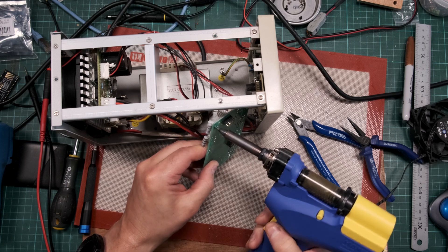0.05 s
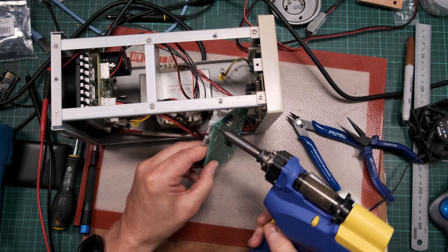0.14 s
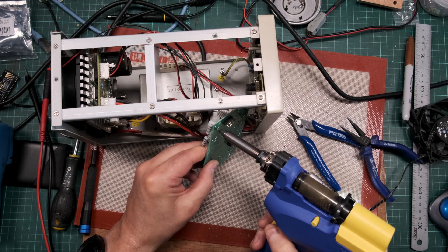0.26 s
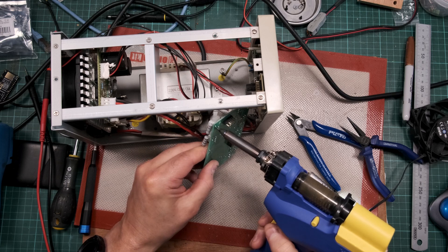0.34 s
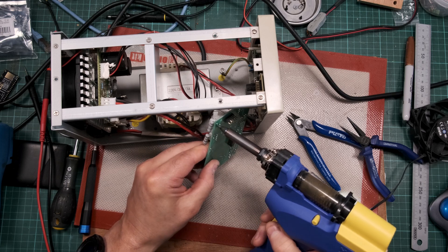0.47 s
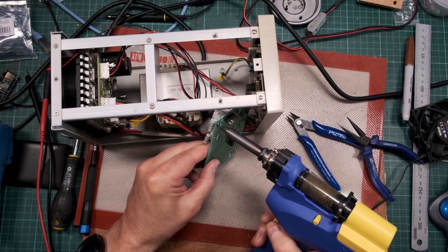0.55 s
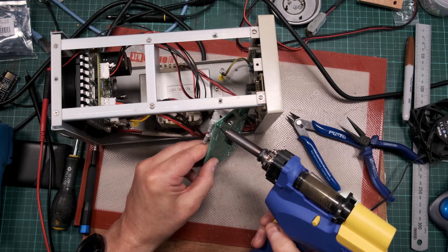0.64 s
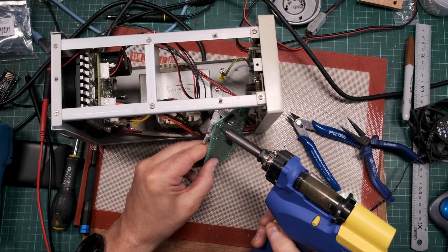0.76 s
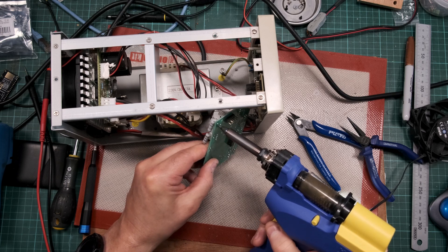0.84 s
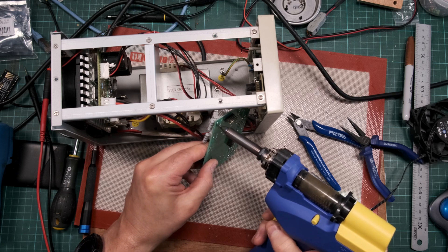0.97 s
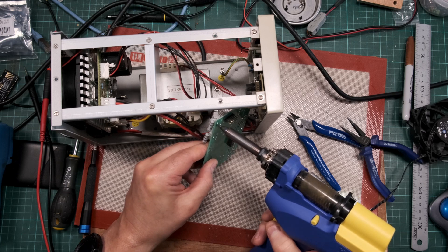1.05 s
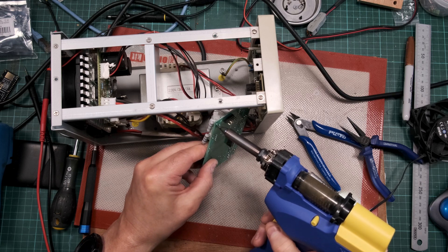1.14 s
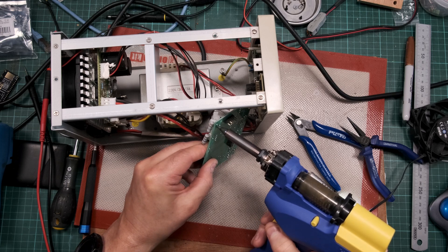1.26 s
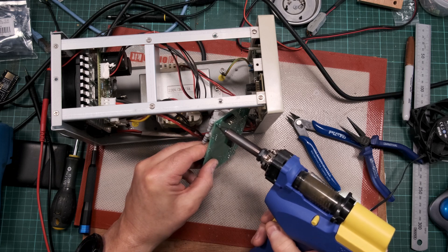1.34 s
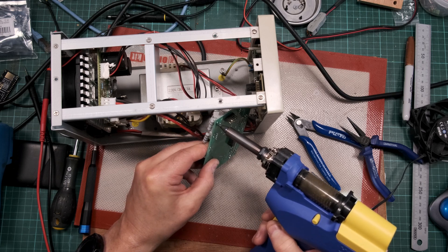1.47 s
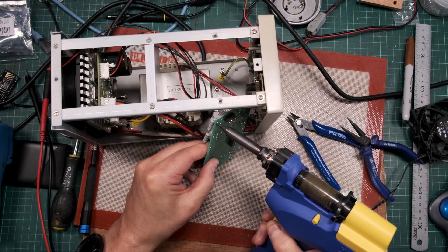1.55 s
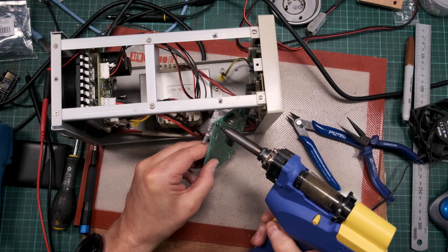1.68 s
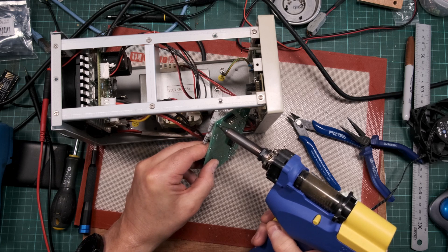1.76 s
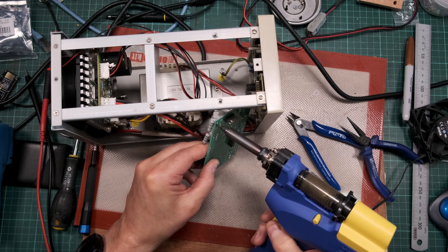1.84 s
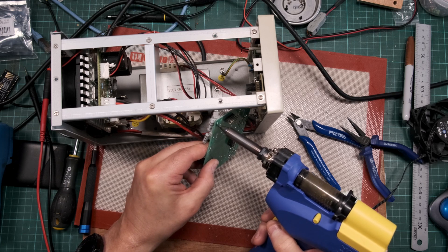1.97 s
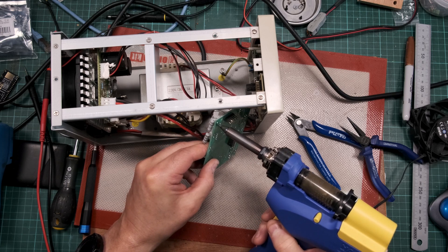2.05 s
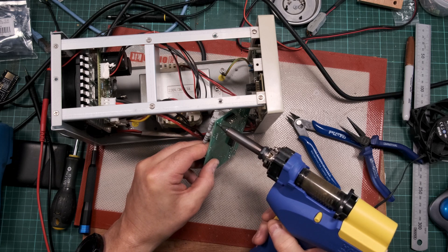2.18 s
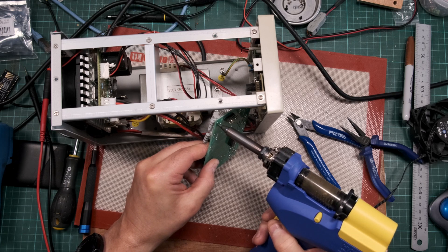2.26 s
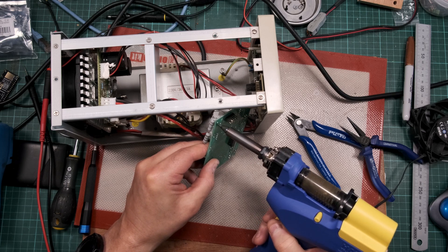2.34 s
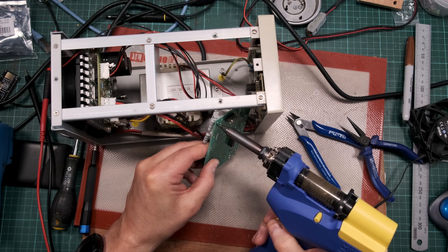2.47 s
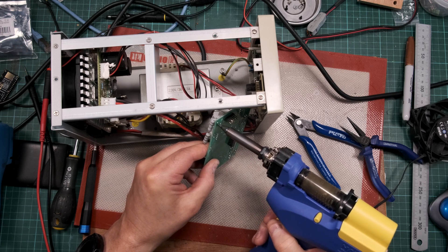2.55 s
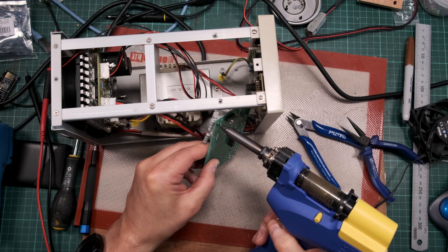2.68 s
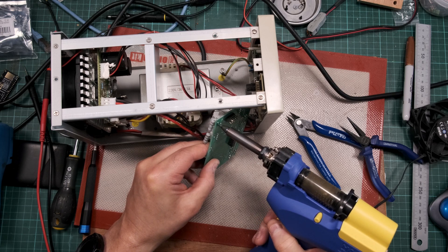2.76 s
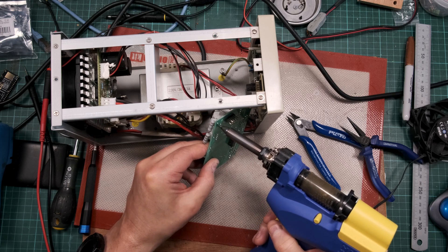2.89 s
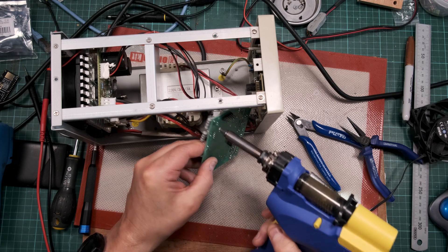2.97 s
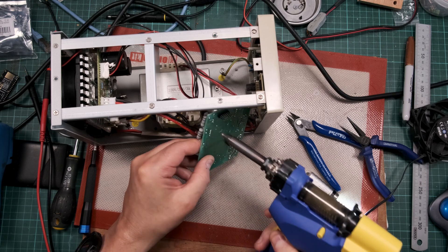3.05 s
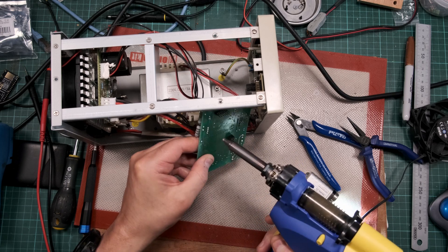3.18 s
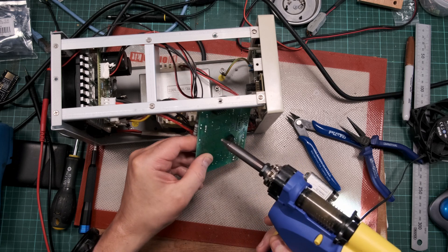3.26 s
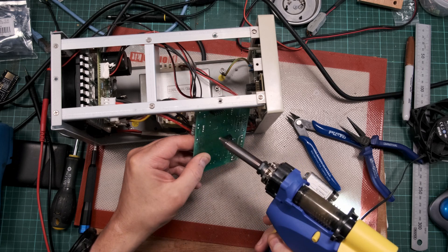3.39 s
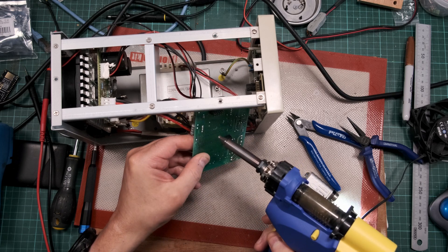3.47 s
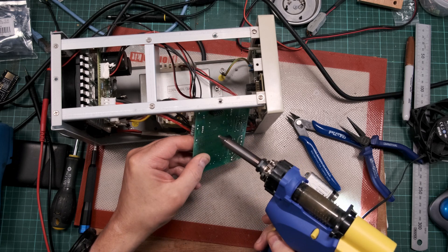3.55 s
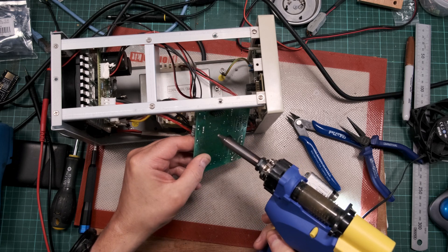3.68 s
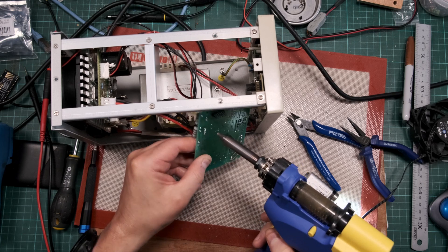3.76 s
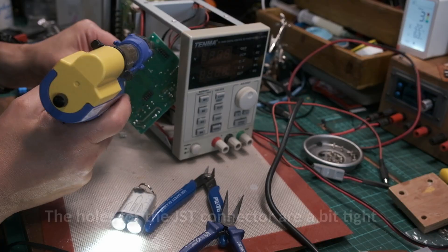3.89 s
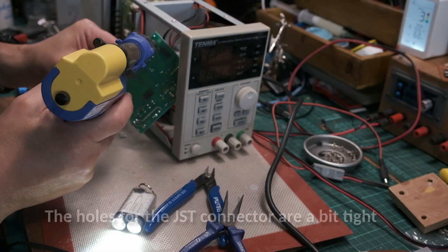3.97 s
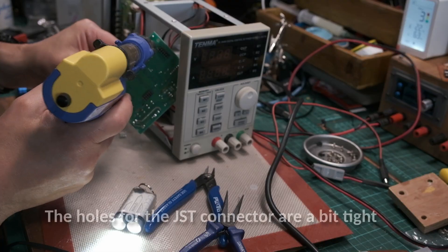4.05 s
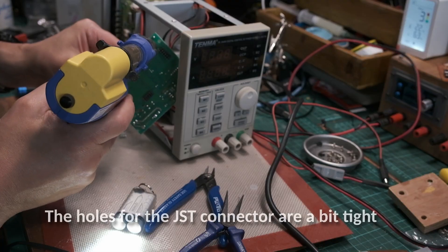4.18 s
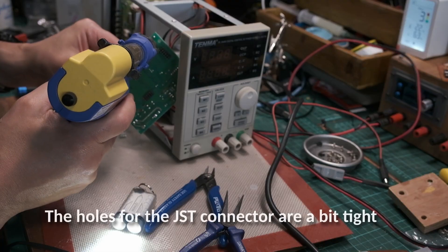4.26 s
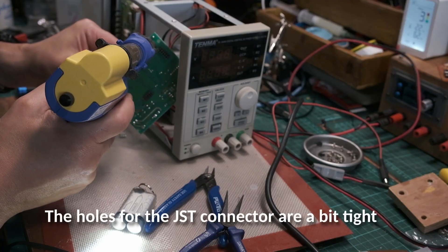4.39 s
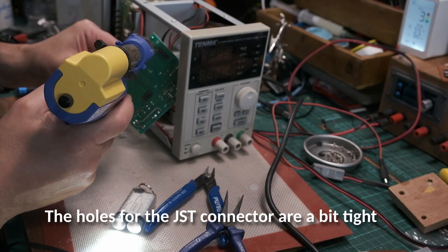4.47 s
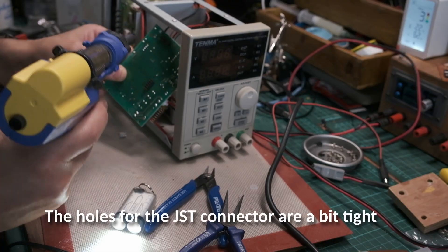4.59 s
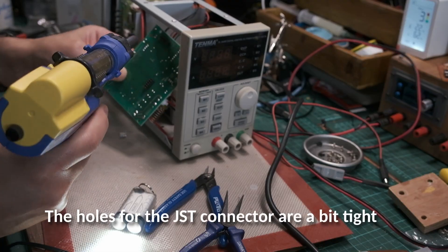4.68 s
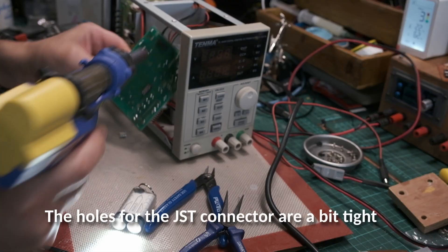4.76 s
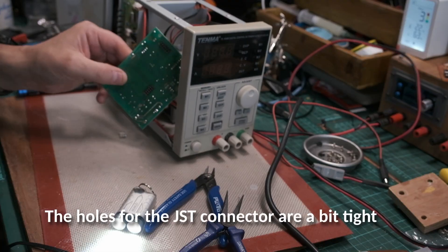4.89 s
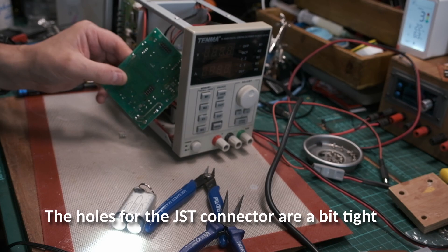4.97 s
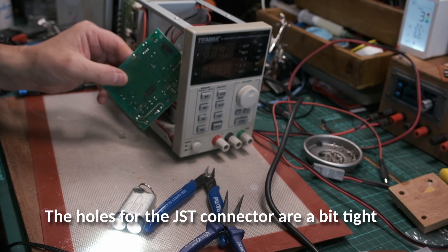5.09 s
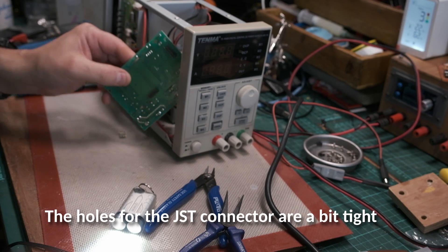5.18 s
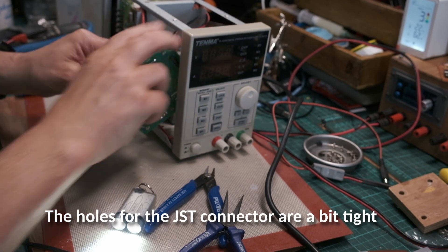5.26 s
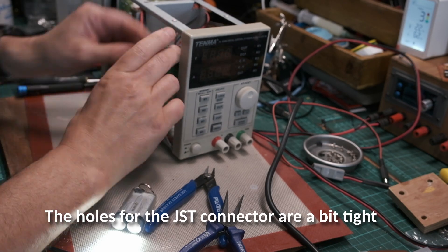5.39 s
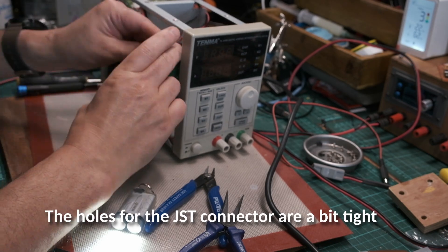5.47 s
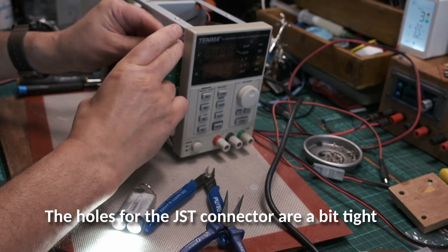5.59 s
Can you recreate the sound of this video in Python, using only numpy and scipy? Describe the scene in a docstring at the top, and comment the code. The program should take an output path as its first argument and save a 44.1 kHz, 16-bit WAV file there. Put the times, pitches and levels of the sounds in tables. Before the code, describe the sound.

In a quiet room with faint fan noise, a desoldering gun's pump buzzes in two short bursts between trigger clicks, then is set down with a clack.

```python
"""Desoldering gun on a workbench

A diaphragm pump runs in two short bursts between trigger clicks: pulse trains of its strokes excite the
housing, the pumped air and the valve. The tip ticks on a circuit board as struck modes, and at the end
the gun is laid down and hands rub over the board in swells of grainy noise. A fan, made of filtered noise
and wavering tones, and a low hum fill the quiet room; the level dips once for a moment."""
import sys
import numpy as np
from scipy import signal
from scipy.fft import rfft, irfft
from scipy.io import wavfile
from scipy.ndimage import uniform_filter1d

SR = 44100
rng = np.random.default_rng(int(sys.argv[2]) if len(sys.argv) > 2 else 0)


def to_linear_factor(level_db):
    """Convert decibel levels (scalar or array-like) to linear amplitude factors."""
    exponent = np.asarray(level_db, float) / 20
    return 10 ** exponent


def inscribe(sig):
    """Save sig as 16-bit PCM at rate SR to the path in sys.argv[1].

    A 1-D sig is mono; a 2-D sig holds one channel per row.
    Samples are clipped to [-1, 1] before scaling.
    """
    pcm = np.round(np.clip(np.atleast_2d(sig).T, -1, 1) * 32767)
    wavfile.write(sys.argv[1], SR, pcm.astype(np.int16))


N = 248265  # length in samples

# Modes of the gun's stand, struck or scraped. Each row: frequency in Hz, level in dB, T60 in seconds.
STAND_MODES = [ (790, -8, .1), (2060, -8, .08), (2500, -2, .05), (2890, -1, .075), (3290, -5, .07),
               (4120, -3, .065), (4720, -3, .05), (5400, -3, .03), (6300, 2, .025), (8120, -10, .05),
               (9400, -20, .08)]


def evened(x):
    """Power normalisation: scales to an rms of 1."""
    return x / np.sqrt(np.mean(x ** 2) + 1e-20)


def read(points, hz):
    """Spectral envelope: gain interpolated in dB over log frequency."""
    f, db = np.transpose(points)
    return to_linear_factor(np.interp(np.log(hz + 1), np.log(f + 1), db))


def peaks(modes, hz):
    """Resonance: steep-sided peaks added in power."""
    power = sum(to_linear_factor(db) ** 2 / (1 + (2 * (hz - f) / width) ** 2) ** 1.86 for f, width, db in modes)
    return np.sqrt(power)


def colour(x, gain):
    """Minimum phase: a causal filter of unit energy built from the gain curve by the Hilbert transform."""
    log_gain = np.log(gain(np.fft.rfftfreq(8192, 1 / SR)) + 1e-5)
    log_gain = np.r_[log_gain, log_gain[-2:0:-1]]
    response = np.exp(log_gain - 1j * signal.hilbert(log_gain).imag)
    impulse = np.fft.ifft(response).real[:4096]
    return signal.oaconvolve(x, impulse / np.linalg.norm(impulse))[:len(x)]


def band(x, tone, lo_hz, hi_hz):
    """Band-pass filtering: one band of a coloured noise, at an rms of 1."""
    return evened(colour(x, lambda f: read(tone, f) / (1 + (lo_hz / (f + 1)) ** 6) / (1 + (f / hi_hz) ** 6)))


def add(mix, s, sound):
    """Superposition: adds a sound to the mix from a time in seconds."""
    part = mix[round(s * SR):][:len(sound)]
    part += sound[:len(part)]


def wander(size, count):
    """Slow random fluctuation: white noise averaged twice over `size` points, at an rms of 1."""
    once = uniform_filter1d(rng.standard_normal(count), size)
    return evened(uniform_filter1d(once, size))


def train(turns):
    """Pulse train: one pulse per completed stroke, shared between the two nearest samples."""
    at = np.interp(np.arange(np.ceil(turns[0]), turns[-1]), turns, np.arange(len(turns)))
    out = np.zeros(len(turns) + 1)
    np.add.at(out, at.astype(int), 1 - at % 1)
    np.add.at(out, at.astype(int) + 1, at % 1)
    return out[:-1]


def blur(x, spread):
    """Dispersion: each band has its own group delay, so strokes lose their edge but keep their pitch."""
    z = rfft(x)
    bass = np.exp(-np.fft.rfftfreq(len(x), 1 / SR) / 700)
    varied = .5 + np.sin(3.16 * wander(size=len(z) // 60, count=len(z))) / 2
    delay = spread * (1.3 * bass + (1 - bass) * varied)  # the deepest bass lags 1.3 spreads
    phase = -2 * np.pi * np.cumsum(delay) * SR / len(x)
    return irfft(z * np.exp(1j * phase), len(x))[:-SR // 50]


def padded(x):
    """Free decay: a tenth of a second of silence in which filters ring out."""
    return np.r_[x, np.zeros(SR // 10)]


def pump(speed, release_s, level_db, fade_db, clack_db, spread):
    """Periodic excitation: strokes push air, the valve opens and shuts and knocks the housing, air puffs."""
    # Housing resonances. Each row: frequency in Hz, width in Hz, level in dB.
    housing = [(539, 140, 5), (760, 110, -2), (901, 83, 1), (1036.7, 107, -1.5), (1310, 110, -3.5),
               (1480, 80, -3), (1825, 71, -4), (1902, 490, -8), (2340, 130, -4.5), (2595, 500, -13),
               (3570, 206, -10), (4080, 58, -20)]
    # Spectrum of the pumped air. Each row: frequency in Hz, level in dB.
    push_tone = [(40, -36.5), (70, -17.5), (95, -5.5), (140, -4.5), (190, -2.5), (285, 3), (380, -4),
                 (480, -10), (700, -41), (2500, -82)]
    # Valve and nozzle resonances. Each row: frequency in Hz, width in Hz, level in dB.
    valve_modes = [(3280, 1660, 0), (4880, 1250, -3.5), (5930, 410, 1), (6640, 530, 3.5), (7440, 260, 1),
                   (8280, 640, 2.5), (8920, 1250, -3.5), (9850, 67, -3.5), (10900, 470, -7),
                   (11800, 1200, -9.5), (14300, 1100, -15.5)]
    # The diaphragm lands in several blows. Each row: delay in seconds, level in dB.
    bounces = [(0, -1.5), (.001, -4), (.0019, -6.5), (.0029, -14.5)]
    # Every start is weak and builds up. Each row: strokes done, level in dB.
    start_rise = [(0, -5), (1, 0), (3.5, 1.5), (11, 2.5)]
    s, hz = np.transpose(speed)
    t = np.arange(s[0], s[-1], 1 / SR)
    rate = np.interp(t, s, hz)
    turns = np.cumsum(rate) / SR - rate[0] / SR
    slack = 1 - rate / 95  # 0 at the full speed of 95 strokes per s, 1 at standstill
    fresh = np.exp(-turns / 14.9)  # the start settles over 14.9 strokes
    coast = slack * (t > t.mean())  # slowing in the later half

    knock_db = level_db + np.interp(turns, *np.transpose(start_rise)) - fade_db * np.maximum(t - release_s, 0)
    push_db = -6.5 - 6 * slack  # over the knock
    clack_db = clack_db + 5 * fresh + 7.5 * coast
    open_db = -5 + 12 * coast  # opening clack over the shutting
    lag = .235 + .14 * fresh + .26 * coast ** 2  # share of a stroke until the valve shuts
    force = to_linear_factor(knock_db) * np.sqrt(SR / rate)  # fewer strokes carry the same power in larger blows
    opens, shuts = force * train(turns), force * train(turns - lag)

    lands = sum(to_linear_factor(db) * np.r_[np.zeros(round(s * SR)), opens][:len(t)] for s, db in bounces)
    loose = to_linear_factor(3) * np.clip(98 / rate - 1, 0, .45)  # at low speed the rod judders through the stroke
    judder = signal.oaconvolve(opens * loose, np.hanning(260))[:len(t)] * rng.standard_normal(len(t)) / 10
    # rushing air shakes the housing all along, more at low speed until the trigger is let go
    flow_db = knock_db - 18 + 22 * loose * (t < release_s)
    flow = to_linear_factor(flow_db) * rng.standard_normal(len(t))
    blows_on_housing = lands + judder + to_linear_factor(-13) * shuts + flow  # shutting knocks more softly
    knock = colour(padded(blows_on_housing),
                   lambda f: peaks(housing, f) * f ** 2 / (f ** 2 + 450 ** 2) / (1 + (f / 4500) ** 4))

    push = colour(padded(opens * to_linear_factor(push_db)), lambda f: read(push_tone, f))

    hits = (to_linear_factor(open_db) * opens + shuts) * to_linear_factor(clack_db + 0.69 * wander(size=200, count=len(t)))
    rattle_decay = np.exp(-np.arange(400) / 26.0)
    rattle = signal.oaconvolve(hits, rattle_decay)[:len(t)] * rng.standard_normal(len(t)) * .05
    # rubber flaps are duller than the jet
    clack = signal.lfilter(*signal.butter(2, 10500, fs=SR), 0.42 * hits + rattle)
    puff_shape = 0.4 + np.exp(-(turns % 1) / 0.27)  # fades through each stroke
    puffs = puff_shape * to_linear_factor(knock_db + clack_db - 7) * rng.standard_normal(len(t))
    valve = colour(padded(clack + puffs), lambda f: peaks(valve_modes, f) * f ** 2 / (f ** 2 + 2500 ** 2))
    return t[0], blur(valve - knock - push, spread)


def pump_bursts():
    """Speed-controlled pulse rate: each burst follows its own curve of stroke rate."""
    # One curve a burst, a stroke at its start. Each row: time in seconds, pump strokes per second.
    speeds = [
        [(2.3404, 45.16), (2.3704, 72.76), (2.4004, 79.13), (2.4404, 86.73), (2.5004, 90.3), (2.6004, 93.92),
         (2.6704, 93.39), (2.7404, 95.53), (2.8104, 95.18), (2.8354, 78.01), (2.8624, 55.43), (2.8854, 32.18),
         (2.9374, 28.93)],
        [(4.2948, 67.76), (4.315, 69.92), (4.335, 92.12), (4.36, 90.83), (4.43, 94.73), (4.535, 92.79)],
    ]
    # One row a burst. Each row: trigger let go in seconds, knock level in dB, fade after that in dB per
    # second, valve clack in dB over the knock, spread of the strokes in seconds.
    bursts = [(2.83, -31.5, 225, -8, 0.00033), (4.519, -31.5, 640, -9.5, 0.0065)]
    out = np.zeros(N)
    for speed, burst in zip(speeds, bursts):
        add(out, *pump(speed, *burst))
    return out


def leak():
    """Turbulent jet noise: air leaks on after each burst as a thin steady hiss with soft ends."""
    # Each row: start in seconds, end in seconds, level in dB.
    leaks = [(2.913, 3.09, -62), (4.536, 4.595, -63)]
    # Spectrum of the hiss. Each row: frequency in Hz, level in dB.
    leak_tone = [(1500, 11), (3000, 2), (7000, 2), (10500, -6), (12500, -1), (13500, -4), (14800, 1),
                 (15800, 13)]
    hiss, out = band(rng.standard_normal(N), leak_tone, 2000, 17000), np.zeros(N)
    for start, end, db in leaks:
        part = hiss[round(start * SR):round(end * SR)]
        add(out, start, to_linear_factor(db) * part * signal.windows.tukey(len(part), .4))
    return out


def blows(events, modes, crack_db, vary_db, rise_s):
    """Modal impact: a crack of noise and decaying modes; dull blows favour the low ones."""
    out, t = np.zeros(N), np.arange(6000) / SR
    hz, db, t60 = np.transpose(modes)[:, :, None]
    draws = rng.standard_normal((len(events), 3, len(modes), 1))
    for (s, peak_db, dull), (vary, detune, phase) in zip(events, draws):
        tilt_db = db + vary_db * vary - 20 * (dull - .5) * np.log2(hz / 4500)
        ring = to_linear_factor(tilt_db - 60 * t / t60) * np.sin(2 * np.pi * hz * (1 + .01 * detune) * t + phase)
        ring = ring.sum(0)
        centre_hz = 12000 * 0.092 ** dull
        crack = colour(rng.standard_normal(len(t)) * to_linear_factor(-60 * t / .018),
                       lambda f: peaks([(centre_hz, centre_hz, 0)], f) * f / (f + 2000))
        blow = (ring / abs(ring).max() + to_linear_factor(crack_db) * crack / 3) * (1 - np.exp(-t / rise_s))
        add(out, s, to_linear_factor(peak_db) * blow / abs(blow).max())
    return out


def trigger():
    """Modal impact: the trigger switch clicks."""
    # Each row: time in seconds, peak level in dB, dullness (0 bright, 1 dull).
    clicks = [(2.3181, -25.5, 0.23), (2.3265, -34.5, 1.2), (2.3435, -15, 0.14), (2.8165, -24, 0.04),
              (4.2946, -22.5, 0.13)]
    # Each row: frequency in Hz, level in dB, T60 in seconds.
    switch_modes = [(2090, -3, 0.012), (3700, -10, 0.0084), (4430, 4, 0.0084), (6060, 3, 0.017),
                    (7660, 4, 0.011), (11310, -6.5, 0.004), (13600, -16.5, .01)]
    return blows(clicks, switch_modes, crack_db=1, vary_db=2.5, rise_s=.0004)


def small_ticks():
    """Modal impact: tip and fingers touch the circuit board; at 3.07 s the valve snaps closed."""
    # Each row: time in seconds, peak level in dB, dullness (0 bright, 1 dull).
    ticks = [(0.0074, -45.5, 0.55), (0.0234, -46.5, 0.26), (0.0443, -50, 0.4), (0.0962, -49, 0.93),
             (0.2892, -58, 0.9), (0.8252, -49, 0.8), (0.9727, -52.5, 0.96), (1.1544, -57.5, 0.25),
             (1.3204, -50.5, 0.3), (1.3808, -51.5, 0.65), (1.4825, -58, 0), (2.2732, -51.5, 0.34),
             (3.0734, -43.5, 0.26), (3.1892, -56.5, 0.5), (3.4366, -51.5, 0.4), (3.9275, -59, 0.6),
             (4.8244, -55, 0.36), (4.9048, -51.5, 0.74), (5.3315, -47.5, 0.32), (5.3853, -43, 0.54),
             (5.5019, -53, 0.47), (5.5204, -67, 0)]
    # Each row: frequency in Hz, level in dB, T60 in seconds.
    tick_modes = [(2104, -1, 0.0166), (2700, -1.5, 0.022), (3560, 0, 0.017), (4120, 5.5, 0.0083),
                  (5220, 9.5, 0.0057), (5980, 2, 0.0056), (7780, -2, 0.0039), (10830, -15, 0.0068)]
    return blows(ticks, tick_modes, crack_db=-7, vary_db=3.5, rise_s=.0008)


def set_down():
    """Modal impact: the gun's tip meets its stand, which rings."""
    # Each row: time in seconds, peak level in dB, dullness (0 bright, 1 dull).
    contacts = [(5.0772, -20, 0.55)]
    return blows(contacts, STAND_MODES, crack_db=-3, vary_db=.8, rise_s=.0008)


def rubs():
    """Friction noise: grains swell and fade, dull strokes have more bass, and scraping rings the stand."""
    # Hands and gun rub over board and stand. Each row: time of the peak in seconds, middle-band level in dB,
    # swell in seconds, fade in seconds (both span 30 dB), dullness in dB.
    strokes = [(4.81, -73, 0.093, 0.1, -5), (4.898, -76.5, 0.11, 0.11, -1), (4.997, -61.5, 0.036, 0.011, 1),
               (5.037, -36, 0.014, 0.026, 5), (5.06, -59.5, 0.028, 0.033, 10.5),
               (5.083, -34, 0.011, 0.022, -3.5), (5.099, -41.5, 0.014, 0.023, 6),
               (5.19, -77.5, 0.06, 0.055, 9), (5.28, -62, 0.074, 0.082, -5.5),
               (5.375, -70.5, 0.065, 0.017, -13.5), (5.388, -63, 0.028, 0.0089, -3),
               (5.45, -71, 0.055, 0.044, -3), (5.506, -69.5, 0.01, 0.075, -6),
               (5.588, -73.5, 0.028, 0.037, -1)]
    # Spectrum of the friction. Each row: frequency in Hz, level in dB.
    rub_tone = [(59, -42), (100, -17.5), (300, -15.5), (431, 0), (490, -4.5), (618, -4.5), (1470, -5.5),
                (1640, -1), (1820, -9), (2450, -3.5), (6220, -2), (15800, -16)]
    grains = rng.standard_normal(N) * to_linear_factor(2.0 * wander(size=40, count=N))
    low, mid, high = (band(grains, rub_tone, *edges) for edges in [(100, 1540), (1500, 5370), (6500, 29000)])
    t, out = np.arange(N) / SR, np.zeros(N)
    for s, db, swell, fade, dull_db in strokes:
        distance = np.maximum((s - t) / swell, (t - s) / fade).clip(0, 9)
        level = to_linear_factor(db - 30 * distance ** 1.6)
        treble_db = -14 - 1.3 * dull_db
        out += level * (mid + to_linear_factor(dull_db) * low + to_linear_factor(treble_db) * high)
    resonances = [(hz, 2.2 / t60, db) for hz, db, t60 in STAND_MODES]  # bandwidth = 2.2 / T60
    return colour(out, lambda f: 1 + to_linear_factor(-7.0) * peaks(resonances, f))


def echo(x):
    """Diffuse reflection: bench and walls return sparse echoes of random sign, dying exponentially."""
    level_db, t60 = -10, 0.065  # t60 in s
    tail, at = np.zeros(SR // 2), np.arange(120, SR // 2 - 20, 20)
    signs = rng.choice([-1., 1.], len(at))
    tail[at + rng.integers(0, 20, len(at))] = signs * to_linear_factor(-60 * at / SR / t60)
    return to_linear_factor(level_db) * signal.fftconvolve(x, tail / np.linalg.norm(tail))[:N]


def room_tone():
    """Broadband and tonal fan noise: filtered noise with faint patches, and narrow wavering tones."""
    # Spectrum of the noise. Each row: frequency in Hz, level in dB.
    noise_tone = [(15, -57), (25, -56), (76, -19), (110, -10), (175, -15), (255, 1), (277, -46.5),
                  (317, -12), (426, -10.5), (462, -13), (837, -10.5), (908, -6), (1480, -20.5),
                  (14700, -35), (15900, -36)]
    # Level of the noise. Each row: time in seconds, level in dB.
    noise_level = [(0, -64.5), (3.1, -65.5), (4.3, -66.5), (5.63, -66.5)]
    # Wavering tones of the fan. Each row: frequency in Hz, level in dB.
    fan_tones = [(463, -81.5), (587, -83.5), (888, -72), (2778, -97), (3634, -93), (14643, -98)]
    frames, hz = N // 256 + 5, np.fft.rfftfreq(1024, 1 / SR)
    a, b, patches = rng.standard_normal((frames, 513, 3)).T
    patches = evened(uniform_filter1d(uniform_filter1d(patches, 10, 0), 12, 1))
    z = (a + 1j * b) * read(noise_tone, hz)[:, None] * to_linear_factor(0.26 * patches)
    noise = evened(signal.istft(z, nperseg=1024, noverlap=768)[1][:N])
    out = noise * to_linear_factor(np.interp(np.arange(N) / SR, *np.transpose(noise_level)))
    for f, db in fan_tones:
        turns = np.cumsum(f + 4.2 * wander(size=3000, count=N)) / SR
        out += to_linear_factor(db + 1.0 * wander(size=2500, count=N)) * np.sqrt(2) * np.sin(2 * np.pi * turns)
    return out


def low_hum():
    """Frequency and amplitude modulation: low wavering tones of a machine nearby swell and sink."""
    # Each row: time of the peak in seconds, width in seconds, frequency in Hz, level in dB.
    swells = [(.2, 1, 117, -77), (1.0, 0.59, 117, -80), (1.95, 0.96, 117, -74.5), (.15, 0.82, 172, -77),
              (1.0, 0.71, 172, -72), (1.7, 0.62, 172, -72.5), (2.15, 0.1, 172, -68.5)]
    t, drift = np.arange(N) / SR, np.cumsum(5.6 * wander(size=6000, count=N)) / SR
    out = np.zeros(N)
    for s, width, hz, db in swells:
        swell = to_linear_factor(db) * np.exp(-(2 * (t - s) / width) ** 2)
        out += swell * np.sqrt(2) * np.sin(2 * np.pi * (hz * t + drift))
    return out


def scene():
    """Superposition: gun, board and hands with their echoes, over the room's background."""
    near = pump_bursts() + leak() + trigger() + small_ticks() + set_down() + rubs()
    return (near + echo(near) + room_tone() + low_hum())[None]


def low_pass(x):
    """Removes everything above the highest recorded frequency."""
    return signal.sosfilt(signal.butter(12, 16480, fs=SR, output="sos"), x)


def record(dry):
    """Gain envelope and band limiting: the level dips briefly, and a steep low-pass ends the band at 15.4 kHz."""
    dip_s, length_s, fade_s, dip_db = 3.847, .011, .009, -30
    away = abs(np.arange(N) / SR - dip_s) - length_s / 2
    dipped = dry * to_linear_factor(dip_db * np.clip(1 - away / fade_s, 0, 1))
    edged = signal.sosfilt(signal.butter(20, 15400, fs=SR, output="sos"), dipped)
    return low_pass(edged)


dry = scene()
out = record(dry)
inscribe(out)
```